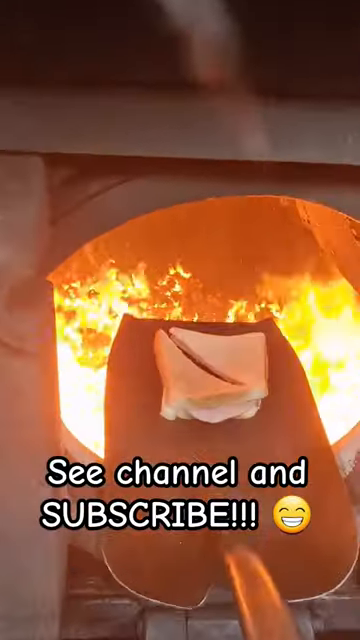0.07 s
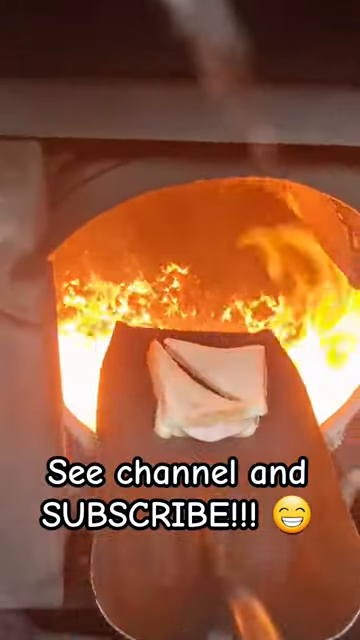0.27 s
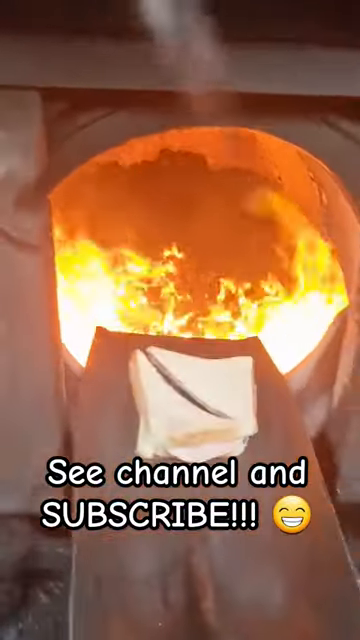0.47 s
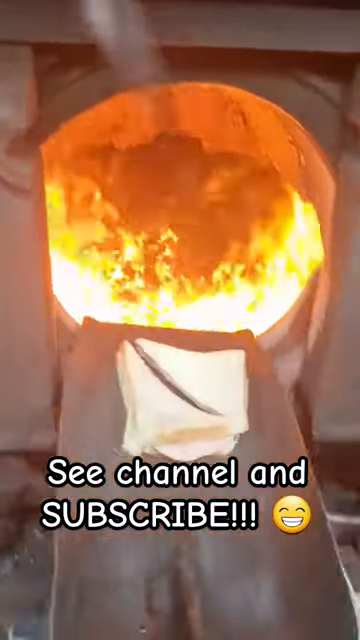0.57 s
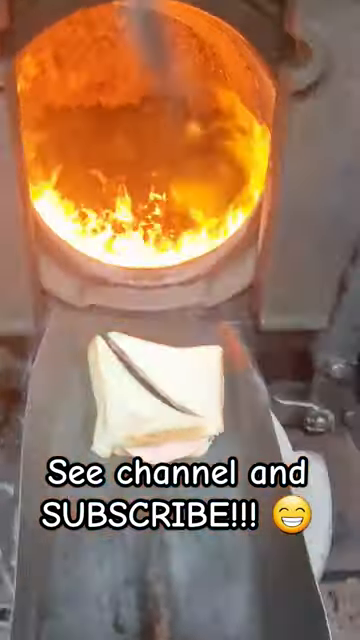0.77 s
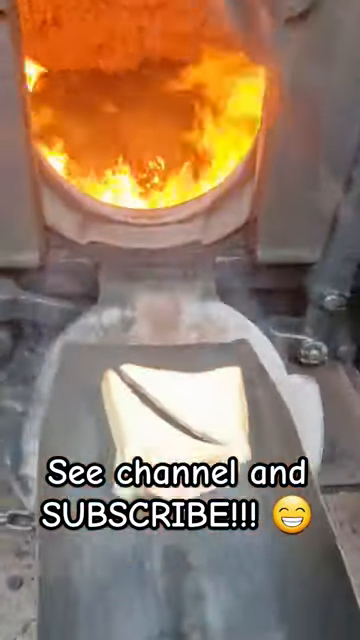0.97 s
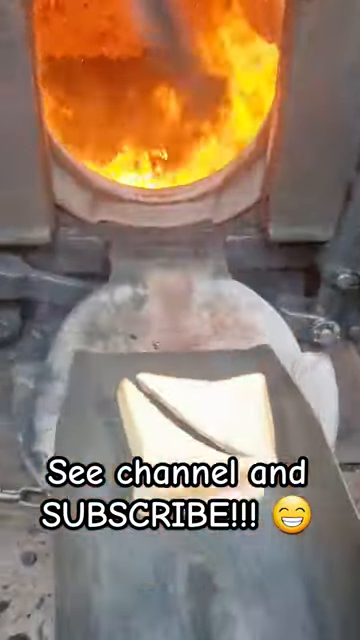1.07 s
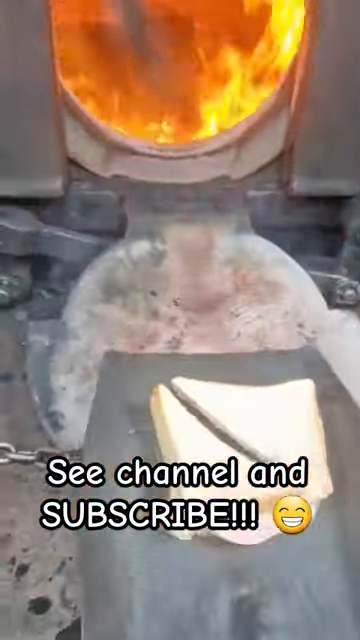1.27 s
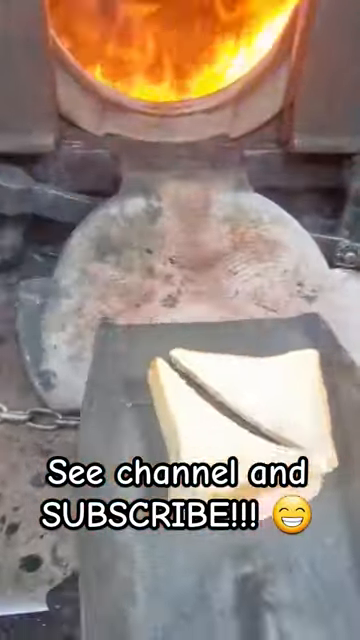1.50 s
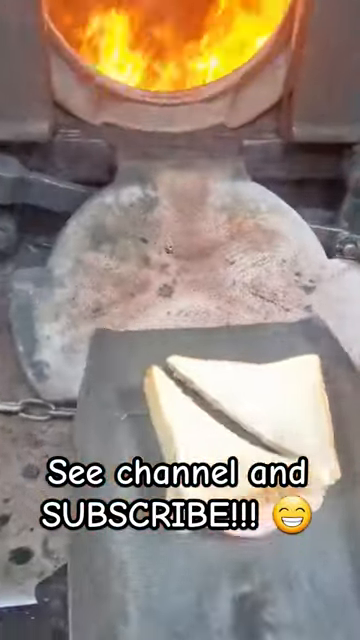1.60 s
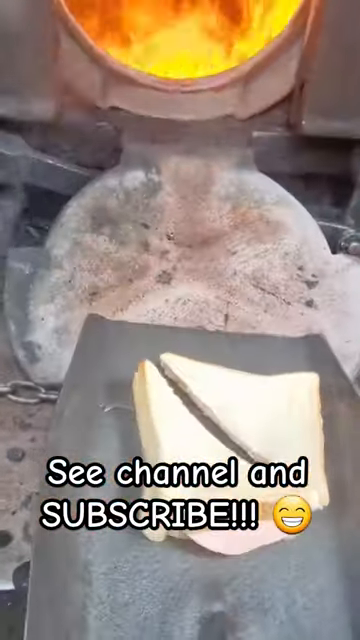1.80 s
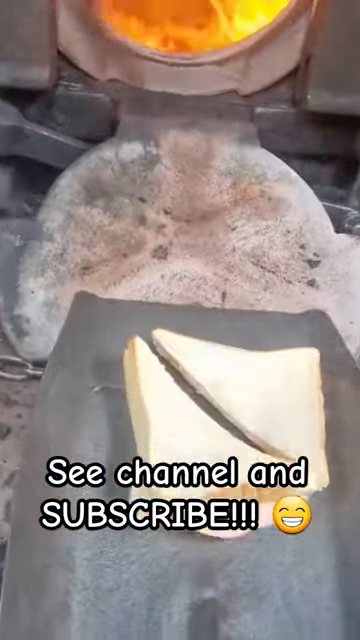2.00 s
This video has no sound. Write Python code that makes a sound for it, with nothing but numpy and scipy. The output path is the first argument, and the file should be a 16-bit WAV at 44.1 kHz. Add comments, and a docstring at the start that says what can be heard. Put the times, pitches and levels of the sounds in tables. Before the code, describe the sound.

Gritty, ringing scrapes and one slam of a steel shovel, with a firebox rumbling underneath.

```python
"""Shovel leaving a firebox.

In a steam locomotive's hard-walled cab, a steel shovel grinds and bumps over the rim of the fire hole,
slips off, slams onto the plate below and is dragged across it in two gritty strokes. Stick-slip
friction makes the rasp and keeps the steel's modes sounding; impacts set them ringing freely.
Fire and boiler rumble and hiss throughout."""
import sys
import numpy as np
from scipy import signal
from scipy.fft import rfft, irfft
from scipy.io import wavfile
from scipy.ndimage import uniform_filter1d

SR = 44100
rng = np.random.default_rng(int(sys.argv[2]) if len(sys.argv) > 2 else 0)


def output_pcm(signal):
    """Save a mono or channel-first signal as 16-bit PCM at the path in sys.argv[1].

    Samples are clipped to [-1, 1] before scaling.
    """
    pcm = np.clip(np.atleast_2d(signal).T, -1, 1) * 32767
    wavfile.write(sys.argv[1], SR, np.round(pcm).astype(np.int16))


N = 90404

# relative spectral densities of fire and boiler, the draught, and each contact: f/Hz, level/dB
FIRE_COLOUR = [(41, -25), (70, -1), (150, -7), (230, -14), (370, -20.5), (560, -11.5), (800, -16.5),
               (1100, -15.5), (2000, -15.5), (3000, -17), (4300, -18), (6200, -23.5), (7400, -15.5),
               (8500, -22.5), (10000, -31.5), (12500, -16.5), (15000, -27.5), (16000, -40)]
DRAUGHT_COLOUR = [(15, -10), (28, -7), (40, -1.5), (52, -7.5), (66, -26), (95, -12.5), (130, -15.5),
                  (180, -19.5), (300, -82), (900, -90)]
SLIDE_COLOUR = [(150, -43), (230, -47), (340, -5), (520, 4), (720, -10), (860, -5), (1300, -7), (2000, -7),
                (3500, -17.5), (5500, -36), (7400, -29), (9800, -41), (14000, -35), (16000, -40)]
RIM_COLOUR = [(150, -36), (300, -16.5), (420, -21), (500, -2.5), (600, -7.5), (720, -3.5), (1100, -10),
              (1600, -12.5), (3200, -11.5), (4500, -26), (7400, -31), (9800, -43), (14200, -30.5),
              (16000, -60)]
PLATE_COLOUR = [(150, -53), (230, -18), (280, -44), (340, -22), (450, -59), (535, -5), (590, -12),
                (655, -9.5), (760, -12), (980, -16), (1120, -24.5), (1500, -18.5), (2900, -18), (7500, -15),
                (9800, -21), (14500, -18.5), (16000, -31)]
SLAM_COLOUR = [(60, -56), (120, -34), (210, 3), (320, -25), (430, -1.5), (600, 0.5), (1000, -7), (1200, -7),
               (2400, -2.5), (4000, -6.5), (5700, -7.5), (8200, -12), (9800, -25.5), (11800, -21),
               (14200, -43), (16000, -64)]
# envelope of the draught's rumble: t/s, level/dB
DRAUGHT_ENVELOPE = [(0.03, -64), (0.05, -42.5), (1.5, -31), (1.65, -37.5), (1.77, -29.5), (1.82, -43),
                    (2.04, -48)]
# reverberation time of the cab: f/Hz, T60/s
CAB_DECAY = [(150, 0.059), (600, 0.13), (2500, 0.11), (8000, 0.12), (16000, 0.043)]
# likeness of left and right: f/Hz, coherence (0-1)
COHERENCE = [(40, .985), (150, .94), (350, .88), (700, .75), (1300, .05), (4000, 0), (15000, 0)]
# stereo balance: f/Hz, left minus right/dB
BALANCE = [(60, 1), (130, -0.2), (290, 3), (640, 2.5), (1410, 1.5), (3100, -1.4), (6820, -0.6),
           (15000, 0.8)]

# blade modes, damped by lying flat on the rim: f/Hz, T60/s, level/dB
PRESSED_MODES = [(346.7, 0.35, 0), (493.3, 0.14, -0.5), (698, 0.045, 7), (1195, 0.3, -13),
                 (1290, 0.046, 2.5), (1500, 0.13, -15), (1831, 0.16, -10.5), (2126, 0.16, -8.5)]
# blade modes: f/Hz, T60/s, level on the rim/dB, on the plate/dB, when slammed/dB
BLADE_MODES = [(227.8, 0.31, -13.5, -11.5, -10), (339.2, 0.61, -23.5, -9, -12.5),
               (414.7, 0.35, -16.5, -15, -34), (526.2, 0.28, -4, -2.5, -1.5), (686, 0.14, -1.5, -13, -14),
               (784, 0.28, -12.5, -5, 2.5), (875, 0.41, -12, -7, -6.5), (941, 0.21, -7, -16, -21),
               (1227, 0.26, -31, -19, -0.5), (1269, 0.28, -11, -8.5, -2), (1365, 0.46, -8, -21, -7),
               (1633, 0.23, -4.5, -17, -5), (1820, 0.8, -27, -18.5, -4), (1960, 0.41, -30, -20, -9),
               (2104, 0.36, -14.5, -8.5, 3.5), (2234, 0.27, -44, -37, 4.5), (2653, 0.27, -20, -17, 0.5),
               (3616, .16, -18, -32, 0), (4398, 0.17, -29, -31, 4.5), (5620, 0.31, -35, -20, -2),
               (6340, 0.18, -26, -33, 3), (7350, 0.08, -20, -14, 5)]
# plate modes: f/Hz, T60/s, level in the long stroke/dB, in the short stroke/dB
PLATE_MODES = [(635, 0.45, -9, -12.5), (984, 0.11, -4, -11), (1503, 0.098, -2, -2.5), (2050, 0.12, -6, 2.5),
               (2399, 0.14, -4.5, -17), (2824, 0.13, -4.5, 0), (2984, 0.13, -1, -3), (3556, 0.064, -6, 1),
               (5460, 0.081, -20, -12)]
# hollow note that sinks and rises as the blade slides over the rim: t/s, f/Hz, level/dB
HOLLOW_NOTE = [(0.151, 493.7, -50), (0.241, 449.1, -29.5), (0.36, 418.6, -34), (0.46, 348.6, -27.5),
               (0.539, 312, -30), (0.6, 430, -27), (0.662, 504, -23)]
# the blade's main note follows the pressure on it: t/s, level/dB
BLADE_SWELL = [(0.57, -31), (0.635, -23), (0.666, -15), (0.7, -22), (0.732, -34), (0.776, -15), (0.81, -21),
               (0.86, -53), (0.98, -49), (1.005, -24), (1.076, -36.5), (1.118, -23), (1.165, -34),
               (1.22, -39), (1.262, -39), (1.3, -39), (1.392, -28), (1.42, -35), (1.48, -33), (1.586, -71),
               (1.616, -31.5), (1.65, -32.5), (1.692, -20), (1.75, -31.5), (1.86, -43), (1.98, -58)]
# the plate's two lowest modes swell as the blade reaches its middle: t/s, lower level/dB, upper/dB
PLATE_SWELL = [(1.12, -69, -41), (1.2, -55, -36), (1.255, -21, -30), (1.31, -42, -33), (1.39, -28, -44),
               (1.42, -38, -38), (1.485, -28, -40), (1.58, -42, -68), (1.64, -40, -50), (1.71, -34, -46),
               (1.785, -33.5, -43), (1.86, -48, -73), (1.96, -64, -85)]

# edges of a scrape's body, middle and treble bands: f/Hz
BAND_EDGES = [180, 1000, 4000, 16500]
# envelopes of the scrapes: t/s, body level/dB, middle level/dB, treble level/dB
RIM_SLIDE = [(0.12, -49.5, -47, -43.5), (0.238, -27, -35, -37), (0.36, -26.5, -28, -37.5),
             (0.425, -25, -21, -31.5), (0.466, -24, -22, -33), (0.488, -29, -23, -35),
             (0.526, -24, -20, -33), (0.545, -29, -23, -36), (0.582, -27, -20, -26.5),
             (0.6, -40, -28.5, -31.5), (0.64, -47, -27, -36)]  # lying flat, then grinding on the tip
RIM_DRAG = [(0.58, -63, -48, -38), (0.63, -30, -34, -38), (0.652, -16.5, -15, -24.5),
            (0.694, -22.5, -28, -50), (0.707, -28.5, -24, -26), (0.713, -29, -15.5, -41),
            (0.754, -18.5, -17.5, -31), (0.772, -25, -25.5, -17), (0.804, -27, -20.5, -34),
            (0.83, -49, -33, -36), (0.86, -38, -39, -47)]
LONG_STROKE = [(0.985, -52, -42, -49), (1.002, -19, -22, -29), (1.04, -28, -35.5, -36),
               (1.066, -26.5, -18.5, -23), (1.11, -26.5, -23.5, -29), (1.154, -25.5, -19, -20),
               (1.18, -23, -26, -29), (1.25, -27, -20.5, -22.5), (1.31, -23, -24, -26),
               (1.396, -31, -29, -30), (1.412, -30, -21.5, -25), (1.506, -34, -29.5, -27),
               (1.59, -52, -53, -55)]
SHORT_STROKE = [(1.61, -53, -64, -65), (1.624, -34, -45, -28.5), (1.642, -43, -31, -30),
                (1.69, -29.5, -16, -21), (1.758, -37, -32.5, -37.5), (1.782, -30, -27.5, -26),
                (1.878, -54, -60, -67), (1.88, -52, -53, -62)]
# blows of the blade: t/s, ring level/dB, clatter level/dB, clatter tilt/(dB per octave)
RIM_BUMPS = [(0.341, -36, -22.5, -3), (0.458, -21.5, -19.5, -5.5), (0.519, -23, -34, -10),
             (0.606, -30, -21.5, -4.5), (0.646, -20.5, -21.5, -2), (0.710, -18, -32, -3),
             (0.767, -12, -18, -4)]
PLATE_BUMPS = [(0.995, -32.5, -24.5, -8), (1.054, -31.5, -22.5, -0.5), (1.203, -21.5, -21.5, -0.5),
               (1.236, -20.5, -14.5, -1.5), (1.378, -58, -20, -4.5), (1.472, -30.5, -22, -3.5),
               (1.616, -36, -26, -10.5), (1.623, -43, -55, 10), (1.657, -34, -20.5, -2.5),
               (1.685, -27, -19.5, -3)]
SLAMS = [(0.9168, -22, -13.5, 0.5), (0.920, -13, -14.5, 1.5), (0.934, -30, -12.5, 0.8),
         (0.957, -28.5, -21.5, 0.5)]  # lands on one corner, then flat, and chatters


def amp(db):
    """A level of 20 dB is a tenfold amplitude."""
    return 10 ** (np.asarray(db) / 20)


def unit(x):
    """Normalisation to an rms of 1."""
    return x / np.sqrt(np.mean(x ** 2) + 1e-20)


def read(points, hz):
    """Interpolation on a logarithmic frequency axis."""
    f, value = np.transpose(points)
    return np.interp(np.log(hz + 1), np.log(f + 1), value)


def envelope(curve, column):
    """Gain by linear interpolation in dB, silent outside the curve."""
    rows = np.array(curve)
    return amp(np.interp(np.arange(N) / SR, rows[:, 0], rows[:, column], left=-120, right=-120))


def fluctuation(cutoff_hz, shape=N):
    """Low-pass filtered noise wanders at random."""
    return signal.sosfilt(signal.butter(2, cutoff_hz, fs=SR, output="sos"), rng.standard_normal(shape))


def stereo(x, colour, tilt_db=0):
    """Partial coherence: two independent signals are coloured and made alike in the bass."""
    hz = np.fft.rfftfreq(x.shape[1], 1 / SR)
    left, other = rfft(x)
    coherence = read(COHERENCE, hz)
    right = coherence * left + np.sqrt(1 - coherence ** 2) * other
    gain = amp(read(colour, hz) + tilt_db * np.log2(hz / 1000 + .1))
    return unit(irfft(np.array([left, right]) * gain, x.shape[1]))


def fire(draught_gain_db=-1.5, roar_db=-39.5, fade_db_per_s=-2.5):
    """Broadband noise: roar and steam hiss over the low rumble of the draught."""
    t = np.arange(N) / SR
    times, db = np.transpose(DRAUGHT_ENVELOPE)
    rumble = stereo(rng.standard_normal((2, N)), DRAUGHT_COLOUR) * amp(np.interp(t, times, db))
    roar = stereo(rng.standard_normal((2, N)), FIRE_COLOUR)
    fade = amp(fade_db_per_s * (t - 1.5))  # the microphone backs away from the fire
    return amp(draught_gain_db) * rumble + amp(roar_db) * roar * fade


def cab_reverb(x, build_up_s=.005):
    """Dense reflections from the steel walls form a diffuse field that decays exponentially."""
    reflections = stereo(rng.standard_normal((2, SR // 3)), [(20, 0), (20000, 0)])
    hz, t, spectra = signal.stft(reflections, SR, nperseg=256)
    decay = amp(-60 * t / read(CAB_DECAY, hz)[:, None])
    tail = signal.istft(spectra * decay * np.minimum(t / build_up_s, 1), SR, nperseg=256)[1]
    return signal.fftconvolve(x, tail / np.linalg.norm(tail[0]), axes=1)[:, :N]


def excited(modes, column):
    """The contact sets each mode's strength: selects rows of f/Hz, T60/s, level/dB."""
    return [(row[0], row[1], row[column]) for row in modes]


def overtones(count=56, low_hz=1489, high_hz=8870, t60=.16):
    """Higher modes of the steel lie scattered over the treble, weakening by 6 dB per octave."""
    place, strength = rng.random((count, 2)).T
    hz = low_hz + (high_hz - low_hz) * (np.arange(count) + place) / count
    db = -13.5 + 10 * np.log10(strength + 0.09) - 6 * np.log2(hz / low_hz)
    return list(zip(hz, np.full(count, t60), db))


def ring(modes):
    """Free vibration is a sum of damped sines; high modes reach left and right out of phase."""
    t, out = np.arange(SR // 3) / SR, 0
    for k, (hz, t60, db) in enumerate(modes):
        phase = (-1) ** k * np.arccos(read(COHERENCE, hz)) * np.array([[.5], [-.5]])
        out = out + amp(db - 60 * t / t60) * np.sin(2 * np.pi * hz * t + phase)
    return out / np.sqrt(np.mean(out[:, :SR // 100] ** 2))  # rms 1 over the first 10 ms


def crowded_modes(x, depth_db=4.6, width_hz=150, life_s=.11, full_depth_hz=1500):
    """Modal overlap: the steel's upper modes form peaks and valleys that shift with the contact point."""
    hz, _, spectra = signal.stft(x, SR, nperseg=1024, noverlap=768)
    ripple = uniform_filter1d(rng.standard_normal(spectra.shape[1:]), round(width_hz / hz[1]), axis=0)
    ripple = unit(uniform_filter1d(ripple, round(life_s * SR / 256), axis=1))
    gain = amp(depth_db * np.minimum(hz / full_depth_hz, 1)[:, None] * np.minimum(ripple, 1.7))
    return unit(signal.istft(spectra * gain, SR, nperseg=1024, noverlap=768)[1][:, :x.shape[1]])


def friction_tone(hz, width_hz, shake_depth=.22, shake_hz=70):
    """Friction sustains a resonance, and stick-slip modulates its amplitude."""
    carrier = np.exp(2j * np.pi * np.cumsum(hz * np.ones(N)) / SR)
    noise = fluctuation(width_hz / 2, (2, N))
    wobble = noise[0] + 1j * noise[1]
    wobble /= abs(wobble) + .3 * noise.std()  # evens the amplitude, keeps the wandering phase
    shake = 1 + shake_depth * unit(fluctuation(shake_hz))
    return unit((carrier * wobble).real * shake)


def hollow_note():
    """Friction excites a broad bending resonance whose frequency moves with the point of support."""
    times, hz, _ = np.transpose(HOLLOW_NOTE)
    pitch = np.interp(np.arange(N) / SR, times, hz)
    return friction_tone(pitch, width_hz=127) * envelope(HOLLOW_NOTE, column=2)


def singing_modes():
    """Driven resonance: the strongest modes of blade and plate sing while the steel is dragged."""
    blade = amp(-2) * friction_tone(hz=534, width_hz=12.8) * envelope(BLADE_SWELL, column=1)
    plate_lower = friction_tone(hz=642, width_hz=16) * envelope(PLATE_SWELL, column=1)
    plate_upper = friction_tone(hz=981, width_hz=36) * envelope(PLATE_SWELL, column=2)
    return blade + plate_lower + plate_upper


def rubbed_modes(slips, modes, positions=3, travel_hz=4.4, spread_db=11.5):
    """Each slip excites an impulse response whose modal weights shift as the contact point travels."""
    t, out = np.arange(N) / SR, 0
    for k in range(positions):
        local_modes = [(hz, t60, db + spread_db * min(hz / 2000, 1) * (2 * rng.random() - 1))
                       for hz, t60, db in modes]
        share = np.maximum(np.cos(2 * np.pi * (travel_hz * t + k / positions)), 0)
        out = out + signal.fftconvolve(slips * share, ring(local_modes + overtones()), axes=1)[:, :N]
    return out


def scrape(curve, colour, modes, ring_db, grit_db, judder_db, judder_hz, slips_per_s=2000, spread_db=3.5):
    """Stick-slip friction: tiny, uneven slips make a rasp and ring the steel, mixed in three bands."""
    judder = judder_db * unit(fluctuation(judder_hz))
    sizes = amp(spread_db * np.minimum(rng.exponential(1, (2, N)), 3) + judder)
    slips = sizes * rng.choice([-1, 1], (2, N)) * (rng.random((2, N)) < slips_per_s / SR)
    rasp = crowded_modes(stereo(slips, colour))
    ringing = rubbed_modes(slips[:1], modes)
    out = 0
    for k in range(len(BAND_EDGES) - 1):
        band = signal.butter(3, BAND_EDGES[k:k + 2], "band", fs=SR, output="sos")
        grit = amp(grit_db[k]) * unit(signal.sosfilt(band, rasp))
        tone = amp(ring_db[k]) * unit(signal.sosfilt(band, ringing))
        out = out + envelope(curve, column=k + 1) * (grit + tone)
    return out


def impacts(blows, colour, modes, clatter_t60, rise_s=0.00079):
    """Impulsive excitation: a blow rings the clear modes and a dying clatter of countless others."""
    out, t = np.zeros((2, N)), np.arange(SR // 3) / SR
    tone, decay = ring(modes), amp(-60 * t / clatter_t60)
    for start_s, ring_db, clatter_db, tilt_db in blows:
        clatter = crowded_modes(stereo(rng.standard_normal((2, len(t))), colour, tilt_db)) * decay
        blow = (amp(ring_db) * tone + amp(clatter_db) * clatter) * np.minimum(t / rise_s, 1)
        start = round(start_s * SR)
        out[:, start:start + len(t)] += blow[:, :N - start]
    return out


def scene():
    """Superposition: the blade goes over the rim, onto the plate and across it, above the fire's noise."""
    faint = overtones()
    on_rim, on_plate, slammed = (excited(BLADE_MODES, column=k) for k in (2, 3, 4))
    long_modes = on_plate + excited(PLATE_MODES, column=2)
    short_modes = on_plate + excited(PLATE_MODES, column=3)
    scrapes = (scrape(RIM_SLIDE, SLIDE_COLOUR, PRESSED_MODES,
                      ring_db=[-5, -4, -8], grit_db=[-8, -6, -5], judder_db=3, judder_hz=68)
               + scrape(RIM_DRAG, RIM_COLOUR, on_rim,
                        ring_db=[-8, -5, -9], grit_db=[-7, -7, -4], judder_db=1, judder_hz=71.6)
               + scrape(LONG_STROKE, PLATE_COLOUR, long_modes,
                        ring_db=[-6, -5, -7], grit_db=[-9, -7, -3.5], judder_db=0.84, judder_hz=89.4)
               + scrape(SHORT_STROKE, PLATE_COLOUR, short_modes,
                        ring_db=[-8, -6, -8], grit_db=[-11, -7, -3.5], judder_db=1, judder_hz=110))
    blows = (impacts(RIM_BUMPS, RIM_COLOUR, on_rim + faint, clatter_t60=0.2)
             + impacts(PLATE_BUMPS, PLATE_COLOUR, long_modes + faint, clatter_t60=0.2)
             + impacts(SLAMS, SLAM_COLOUR, slammed + faint, clatter_t60=0.17))
    return scrapes + amp(-3) * cab_reverb(scrapes) + blows + hollow_note() + singing_modes() + fire()


def record(dry, start_s=0.022, cutoff_hz=15800):
    """Two microphones of unequal frequency response, with clipping, a silent start and a band limit."""
    balance_db = read(BALANCE, np.fft.rfftfreq(N, 1 / SR)) * np.array([[.5], [-.5]])
    coloured = irfft(rfft(dry) * amp(balance_db), N)
    heard = np.clip(coloured, -1, 1) * (np.arange(N) / SR > start_s)
    lowpass = signal.firwin(511, cutoff_hz, window=("kaiser", 9), fs=SR)
    return signal.oaconvolve(heard, lowpass[None], "same")


dry = scene()
out = record(dry)
output_pcm(out)
```